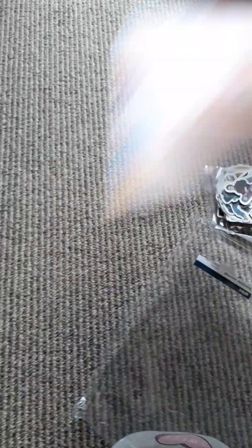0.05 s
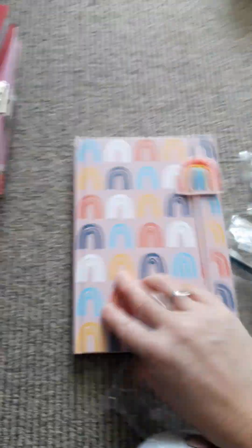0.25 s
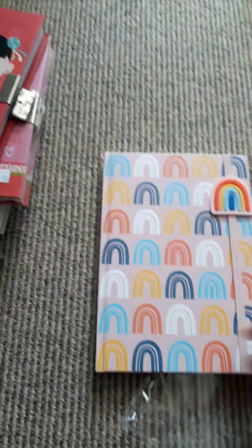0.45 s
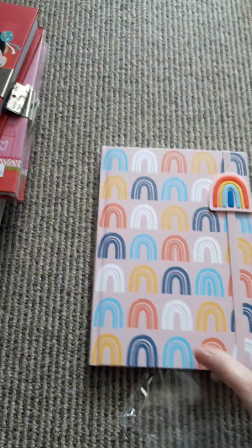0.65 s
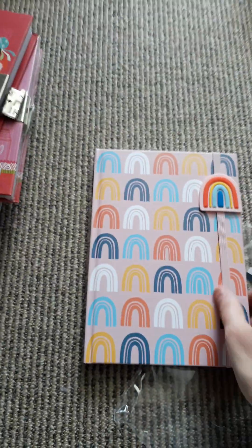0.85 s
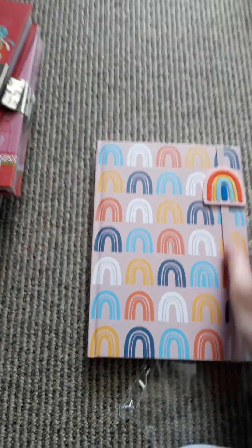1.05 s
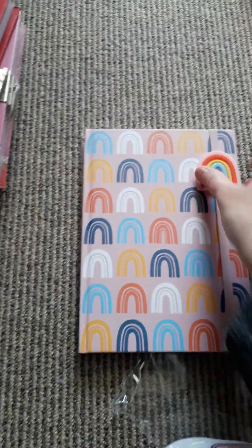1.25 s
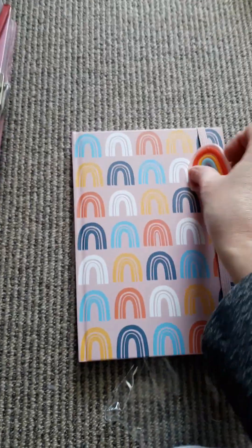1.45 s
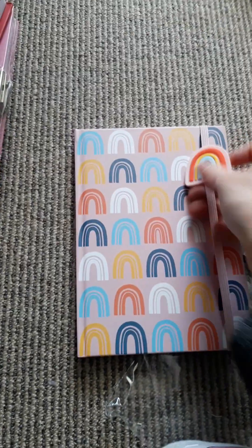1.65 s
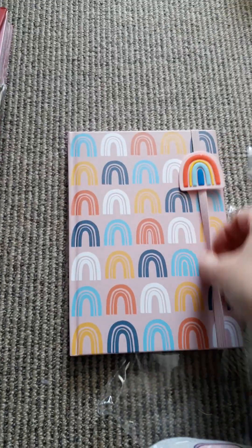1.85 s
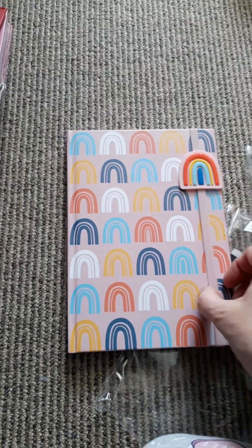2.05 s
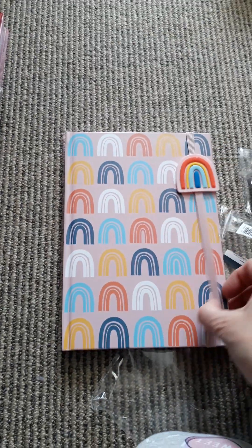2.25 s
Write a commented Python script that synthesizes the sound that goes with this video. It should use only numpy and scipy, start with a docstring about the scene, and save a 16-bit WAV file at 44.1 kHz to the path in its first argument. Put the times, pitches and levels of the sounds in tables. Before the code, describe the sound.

In a small, quiet room, a book is set down on thin plastic with a quick knock and slap. Light handling follows close to the microphone: scattered crinkles, a small snap of an elastic band and soft finger taps.

```python
"""In a small room, a hardback journal is set down on a plastic wrapper lying on carpet.
Its edge knocks and excites bending modes; then the cover slaps flat, the boards ring and the book thuds.
A hand nudges it, with the friction noise of skin, and plucks at its elastic band and rubber charm,
while creases of the wrapper buckle underneath, ticking and crinkling.
The room adds a short reverberation and a faint steady hum."""
import sys
import numpy as np
from scipy import signal
from scipy.fft import rfft, irfft, next_fast_len
from scipy.io import wavfile
from scipy.ndimage import uniform_filter1d

SR = 44100
rng = np.random.default_rng(int(sys.argv[2]) if len(sys.argv) > 2 else 0)


def wav_record(signal):
    """Record a signal, one row per channel, as 16-bit PCM in the file named by sys.argv[1]."""
    frames = np.transpose(np.atleast_2d(signal))
    bounded = np.clip(frames, -1, 1)
    # unit amplitude maps onto the largest positive 16-bit level
    quanta = np.round(bounded * 32767).astype(np.int16)
    wavfile.write(sys.argv[1], SR, quanta)


N = 105840
BLOCK = 8192  # samples; HZ and T are its frequency and time axes
HZ = np.fft.rfftfreq(BLOCK, 1 / SR)
T = np.arange(BLOCK) / SR


def amp(db):
    """Decibels to amplitude ratio."""
    return 10 ** (np.asarray(db) / 20)


def unit(x):
    """Normalisation to rms 1."""
    return x / np.sqrt(np.mean(x ** 2) + 1e-20)


def along(points, hz):
    """Interpolation of (frequency [Hz], value) points on a logarithmic frequency axis."""
    f, v = np.transpose(points)
    return np.interp(np.log(hz + 1), np.log(f + 1), v)


def envelope(rows):
    """Amplitude envelope through (time [s], level [dB]) points."""
    return amp(np.interp(np.arange(N) / SR, *np.transpose(rows)))


def filtered(x, response):
    """Linear filtering: the spectrum is multiplied by a frequency response."""
    size = next_fast_len(len(x) + BLOCK)
    return irfft(rfft(x, size) * response(np.fft.rfftfreq(size, 1 / SR)), size)[:len(x)]


def coloured(x, spectrum):
    """Spectral shaping by (frequency [Hz], gain [dB]) points, at rms 1."""
    return unit(filtered(x, lambda hz: amp(along(spectrum, hz))))


def add(track, s, sound):
    """Superposition of a sound on the track at time s."""
    start = max(0, round(s * SR))
    part = track[start:start + len(sound)]
    part += sound[:len(part)]


def burst(decay_s, colour_db):
    """Contact noise decays exponentially in a minimum-phase filter; its energy is that of 4 ms at rms 1."""
    noise = rfft(rng.standard_normal(BLOCK) * np.exp(-T / decay_s))
    smooth_power = np.abs(uniform_filter1d(np.abs(noise) ** 2, size=160))
    noise /= np.sqrt(smooth_power + 1e-12)
    cepstrum = irfft(np.log(amp(colour_db)))
    cepstrum[1:BLOCK // 2] *= 2  # folding onto positive time makes the filter causal
    cepstrum[BLOCK // 2 + 1:] = 0
    shaped = irfft(noise * np.exp(rfft(cepstrum)))
    return unit(shaped)[:BLOCK // 2] * np.sqrt(.004 * SR / BLOCK)


def impacts(rows, spectrum):
    """Source and filter: short contacts, each of its own length and brightness, excite one body."""
    out = np.zeros(N)
    octaves = np.log2((HZ + 50) / 1000)
    for s, db, decay_s, tilt in rows:
        add(out, s, amp(db) * burst(decay_s, along(spectrum, HZ) + tilt * octaves))
    return out


def ringing(modes, attack_s=.002):
    """Free vibration: a sum of damped modes with a soft onset."""
    vibration = sum(amp(db - 60 * T / t60) * np.sin(2 * np.pi * hz * T) for hz, db, t60 in modes)
    return vibration * (1 - np.exp(-T / attack_s))


def background(air_db=-66.5):
    """Stationary sound: the low harmonics of an appliance over broadband room noise."""
    # hum partials (frequency [Hz], rms level [dB])
    partials = [(49, -73.5), (147, -65), (196, -78), (343, -78)]
    # room noise spectrum (frequency [Hz], gain [dB])
    air = [(15, -37.5), (25, -9.5), (169, 1.5), (253, -2), (495, -4.5), (1110, -15), (2360, -20),
           (2630, -6), (2850, -42), (4620, -17.5), (5580, -34), (7300, -22.5), (15500, -28)]
    t = np.arange(N) / SR
    hum = sum(amp(db) * np.sqrt(2) * np.sin(2 * np.pi * (hz * t + rng.random())) for hz, db in partials)
    return hum + amp(air_db) * coloured(rng.standard_normal(N), air)


def hand_rub(slip_db=3.5):
    """Sliding friction: uneven little slips of skin on the cover modulate a noise."""
    # strength of the rubbing (time [s], level [dB])
    rubbing = [(0, -57.5), (.1, -69.5), (.205, -66.5), (.225, -53.5), (.29, -33), (.345, -29), (.4, -47.5),
               (.48, -73.5), (.56, -78.5), (.65, -59.5), (.8, -58), (1.015, -61), (1.07, -55), (1.2, -60),
               (1.42, -58.5), (1.51, -78), (1.57, -58), (1.68, -55), (1.76, -51.5), (1.88, -54.5),
               (1.97, -54), (2.03, -73.5), (2.4, -66.5)]
    # friction spectrum (frequency [Hz], gain [dB])
    skin = [(59, -67.5), (100, -41.5), (137, -41), (172, -5), (633, -6), (1260, -8), (1490, -6.5),
            (4640, -12), (15000, -32)]
    slips = unit(uniform_filter1d(rng.standard_normal(N), size=260))
    return envelope(rubbing) * coloured(rng.standard_normal(N) * amp(slip_db * slips), skin)


def wrapper_crinkle(grains_per_s=1300, spread_db=2.8):
    """Shot noise: many tiny creases give way at random while the journal shifts."""
    # strength of the crinkling (time [s], level [dB])
    crinkling = [(0, -56.5), (.04, -77.5), (.08, -85), (.55, -78), (.6, -49), (.69, -55.5), (.8, -72),
                 (.86, -70), (1.012, -65), (1.05, -38), (1.2, -77), (1.33, -56), (1.42, -59), (1.5, -71.5),
                 (1.58, -40.5), (1.67, -81), (1.78, -51.5), (1.87, -66), (1.95, -70), (2.05, -68),
                 (2.18, -68.5), (2.25, -62), (2.4, -67)]
    # spectrum of the tiny creases (frequency [Hz], gain [dB])
    rustle = [(300, -28.5), (1000, 1.5), (1600, -2), (2400, 3.5), (3300, -2), (4500, -7.5), (6500, -16.5),
              (9500, -16), (12000, -29.5), (15500, -23)]
    grains = (rng.random(N) < grains_per_s / SR) * rng.choice([-1, 1], N)
    sizes = amp(spread_db * np.minimum(rng.exponential(size=N), 4))
    return envelope(crinkling) * coloured(grains * sizes, rustle)


def ringing_ticks(ring_db=9.5, ring_octaves=.41, spread_octaves=.06):
    """Brief resonances with a sharp edge: pops of the wrapper's creases, and a soft tap near the end."""
    # ticks (time [s], level [dB], pitch [Hz], relative edge level [dB], edge cutoff [Hz])
    ticks = [(.019, -48, 3100, -34, 7000), (0.0288, -46, 3400, -25, 7000), (0.2376, -26, 4150, -20, 14000),
             (0.2407, -39.5, 9000, -3, 14000), (0.25, -38, 4240, -3.5, 14250),
             (0.2535, -35, 4410, -13, 10180), (0.2796, -41, 4500, -2, 14100), (0.286, -46, 3580, -7, 11570),
             (0.325, -24, 3300, -31.5, 8850), (0.5844, -48, 2500, -25, 7000), (0.589, -41, 2780, -22, 7200),
             (0.604, -35, 3280, -12, 7810), (0.6299, -44.5, 2930, 0, 7940), (0.6471, -45, 3260, -17, 8000),
             (0.6561, -35, 2750, -9.5, 6970), (0.6694, -34, 2760, -14, 7900),
             (.713, -43.5, 2850, -33, 7000), (0.769, -45, 2810, -12, 8000),
             (0.8185, -50.5, 3500, -2, 13000), (0.8238, -44, 3900, 1.5, 14030),
             (0.828, -44, 7000, 3, 13900), (0.9119, -46, 3320, -13, 8100), (0.9398, -45, 1740, -28.5, 7000),
             (0.961, -46.5, 2480, -42, 7000), (1.0154, -37, 4150, -9, 12460),
             (1.031, -31.5, 2520, -4.5, 14050), (1.034, -36.5, 2470, -12, 15010),
             (1.059, -36, 2750, -8, 14960), (1.1846, -40.5, 2820, -19, 7010),
             (1.2457, -40, 2830, -29, 7000), (1.2519, -40, 2840, -30, 6940), (1.2675, -30, 2980, -9, 12980),
             (1.3327, -42, 2600, -16, 9020), (1.3485, -38.5, 3020, -21.5, 8060),
             (1.4, -46, 2150, -28, 7010), (1.423, -47.5, 1900, -29, 6990), (1.438, -37.5, 3640, -37, 13000),
             (1.521, -47, 2330, -32, 7000), (1.5379, -32.5, 5770, -18, 13000),
             (1.5384, -24.5, 4730, -21.5, 13000), (1.5742, -34.5, 2500, -12, 10930),
             (1.5808, -39.5, 2530, -10, 9920), (1.5858, -35.5, 2400, -7, 10030),
             (1.628, -41, 2640, -24, 7000), (1.6346, -40, 2860, -27, 7000), (1.654, -45.5, 5700, 2, 11040),
             (1.689, -42, 3770, -22, 7000), (1.7083, -37.5, 2310, -34, 7000),
             (1.7268, -39.5, 3550, -23, 8000), (1.7405, -39, 3670, -17, 8000),
             (1.7471, -41.5, 2750, -12, 10000), (1.763, -39.5, 2407, -18.5, 9100),
             (1.775, -45, 4020, -3.5, 14920), (1.8876, -49, 3600, -18, 6900),
             (1.9113, -47.5, 2970, -22, 7000), (2.113, -47, 2430, -35, 6950),
             (2.1178, -51, 2450, -35, 7000), (2.2562, -52.5, 2570, -33, 7000)]
    # response of the plastic film (frequency [Hz], gain [dB])
    film = [(40, -54.5), (120, -10.5), (500, -19), (950, -2), (1450, -12), (2400, 0.5), (3100, -12.5),
            (4200, -5), (5800, -16), (7400, -19), (15000, -23)]
    # spectrum of the sharp edge (frequency [Hz], gain [dB])
    edge = [(2500, -47), (5000, 3.5), (7500, 3), (9500, 4), (11500, -2), (15500, 2)]
    out = np.zeros(N)
    for s, db, hz, edge_db, cutoff_hz in ticks:
        octaves = np.log2((HZ + 1) / hz)
        peak_db = ring_db * np.exp(-(octaves / ring_octaves) ** 2 / 2)
        rolloff_db = 12 * np.maximum(octaves - .85, 0)
        stiffness_shift = 2 ** (spread_octaves * rng.standard_normal())
        tick_colour = along(film, HZ / stiffness_shift) + peak_db - rolloff_db
        edge_colour = along(edge, HZ) - 22.5 * np.log2(np.maximum(HZ / cutoff_hz, 1))
        add(out, s, amp(db) * burst(decay_s=.0012, colour_db=tick_colour))
        add(out, s, amp(db + edge_db) * burst(decay_s=.00073, colour_db=edge_colour))
    return out


def cover_knocks():
    """Impact excitation: knocks of the edge and fingers are coloured by the cover's resonances."""
    # contacts (time [s], level [dB], decay [s], tilt [dB/octave])
    knocks = [(.2155, -26, 0.01, -3), (.2245, -26.5, 0.0059, 2), (.2508, -24, 0.0037, 4),
              (.3745, -37, 0.0026, -5), (.586, -46, 0.015, -0.5), (.621, -46, 0.011, -8),
              (.645, -48.5, 0.014, -13.5), (.668, -44.5, 0.008, 4), (.824, -46.5, 0.0038, 5.5),
              (1.031, -44, 0.0048, 1), (1.058, -34, 0.012, 1.5), (1.0697, -41, 0.0023, 1),
              (1.438, -43, 0.0026, 4.5), (1.5522, -34, 0.0076, -2), (1.5744, -40, 0.0089, -5),
              (1.585, -37, 0.0013, 3.5), (1.657, -45, 0.036, -0.5), (1.7266, -41.5, 0.0033, 0),
              (1.741, -39.5, 0.0048, 5), (1.820, -44, 0.0093, 3), (1.846, -49, 0.0071, -0.5),
              (1.9113, -40, 0.0029, 2), (1.947, -48.5, 0.0095, 1.5), (1.9957, -47, 0.0032, 0.5),
              (2.112, -49, .008, -4)]
    # response of the cover (frequency [Hz], gain [dB])
    cover = [(35, -41), (80, -20.5), (170, -0.5), (250, -4.5), (345, 5), (480, -11.5), (605, 3.5),
             (690, -1.5), (790, 3.5), (960, -4), (1200, -5.5), (1400, -1), (1630, -32.5), (2310, -7.5),
             (3500, -16.5), (4200, -16), (15000, -48)]
    return impacts(knocks, cover)


def rim_touches():
    """Mode shapes: a touch on the rim best excites the modes that move most where it lands."""
    # rim touching down (time [s], level [dB], position along the rim [0-1])
    touches = [(.2235, -21.5, .36), (.2515, -21.5, .46)]
    # bending modes in order (frequency [Hz], relative level [dB], T60 [s])
    modes = [(330, -8, 0.045), (603, 0.5, 0.086), (820, 1, 0.06), (1153, 2.5, 0.034), (1290, -4, 0.062)]
    out = np.zeros(N)
    for s, db, position in touches:
        for order, mode in enumerate(modes, 1):
            coupling = np.sin(order * np.pi * position)
            add(out, s, amp(db) * coupling * ringing([mode]))
    return out


def cover_slap(ring_start_s=.2995, ring_db=-15):
    """Impact and free decay: the cover lands flat in rapid contacts and leaves the boards ringing."""
    # contacts (time [s], level [dB], decay [s], tilt [dB/octave])
    slaps = [(.2935, -17.5, 0.0024, -2), (.2968, -18, 0.0057, 5), (.3005, -15, 0.0033, 0.5),
             (.3038, -14, 0.006, 2)]
    # spectrum of the slap (frequency [Hz], gain [dB])
    spectrum = [(30, -65.5), (80, -57), (170, -9.5), (250, -13), (340, -6), (450, -4), (620, -11.5),
                (950, -1), (1300, -4), (1650, -15), (2270, -2.5), (3100, -12), (4340, -10.5), (5900, -19.5),
                (8200, -16.5), (11500, -31), (15500, -33)]
    # board modes (frequency [Hz], relative level [dB], T60 [s])
    boards = [(432, -16.5, 0.19), (525.3, -15, 0.21), (1240, -22, 0.16), (2320, -15, 0.08)]
    out = impacts(slaps, spectrum)
    add(out, ring_start_s, amp(ring_db) * ringing(boards))
    return out


def carpet_thud(peak_s=.3042):
    """Heavy damping: a low pulse swells as the book settles and is stopped at once by the carpet."""
    # Gaussian pressure pulses (frequency [Hz], level [dB], half-width [s])
    pulses = [(187, -18.5, .006), (332, -17.5, .006)]
    t = np.arange(N) / SR - peak_s
    return -sum(amp(db) * np.exp(-(t / half_s) ** 2) * np.cos(2 * np.pi * hz * t)
                for hz, db, half_s in pulses)


def band_flicks():
    """Damped impacts: the elastic band and rubber charm strike the cover."""
    # contacts (time [s], level [dB], decay [s], tilt [dB/octave])
    flicks = [(1.0582, -24.5, 0.0058, 3), (1.0697, -33.5, 0.0038, -7), (1.082, -43, 0.0066, -4),
              (1.132, -54, 0.0099, -2)]
    # spectrum of band and charm on the cover (frequency [Hz], gain [dB])
    charm = [(80, -54), (200, -24.5), (340, -11), (500, -21), (1150, -27), (1410, -1.5), (1650, -17),
             (1900, 6), (2150, 2.5), (2600, -3.5), (2920, -5), (4000, -12.5), (7000, -33), (15000, -35)]
    return impacts(flicks, charm)


def room(x, echo_s=.0045, echo_db=-17.5, tail_delay_s=.009, tail_db=-10):
    """Reverberation: one early reflection, then a short diffuse tail of decaying noise."""
    # reverberation time (frequency [Hz], T60 [s])
    t60 = [(100, 0.33), (400, 0.25), (2400, 0.26), (6000, 0.21), (14000, 0.13)]
    # initial spectrum of the tail (frequency [Hz], gain [dB])
    colour = [(100, -1), (200, -19), (400, 3), (700, -5.5), (2100, -1.5), (3200, -7), (6000, -0.5),
              (14000, 0)]
    out = np.zeros(N)
    add(out, echo_s, amp(echo_db) * x)
    for start in range(0, N, BLOCK):  # a fresh random tail for each block
        hz, t, noise = signal.stft(rng.standard_normal(SR // 2), SR, nperseg=256)
        decay_db = along(colour, hz)[:, None] - 60 * t / along(t60, hz)[:, None]
        tail = signal.istft(noise * amp(decay_db), SR)[1]
        reverberation = signal.fftconvolve(x[start:start + BLOCK], tail / np.linalg.norm(tail))
        add(out, start / SR + tail_delay_s, amp(tail_db) * reverberation)
    return out


def scene():
    """Superposition of direct sound, reverberation and background in one channel."""
    journal = cover_knocks() + rim_touches() + cover_slap() + carpet_thud()
    direct = journal + band_flicks() + ringing_ticks() + wrapper_crinkle() + hand_rub()
    return (direct + room(direct) + background())[None]


def record(dry, bass_hz=57, top_hz=15900):
    """Band limiting: the microphone is a second-order high-pass, and the recorder cuts the top treble."""
    def response(hz):
        high_pass = (1j * hz / (bass_hz + 1j * hz)) ** 2
        low_pass = np.clip((top_hz - hz) / 500 + .5, 0, 1)
        return high_pass * low_pass
    return np.array([filtered(channel, response) for channel in dry])


dry = scene()
out = record(dry)
wav_record(out)
```